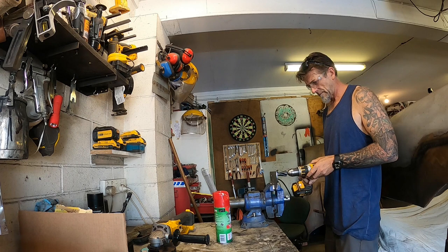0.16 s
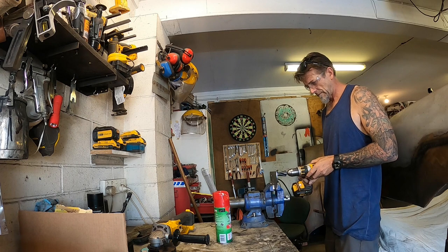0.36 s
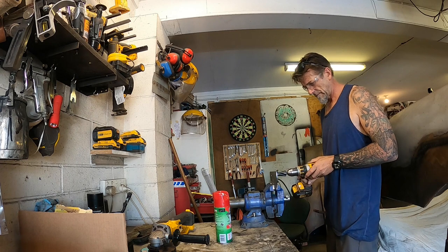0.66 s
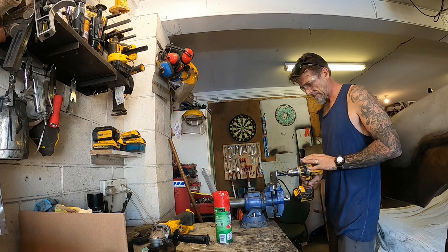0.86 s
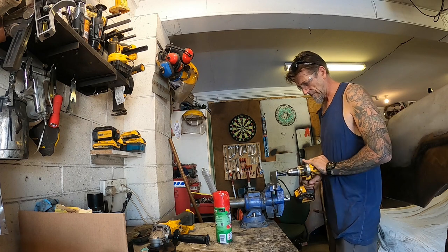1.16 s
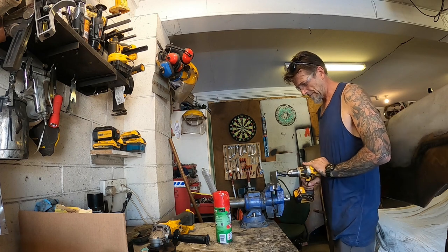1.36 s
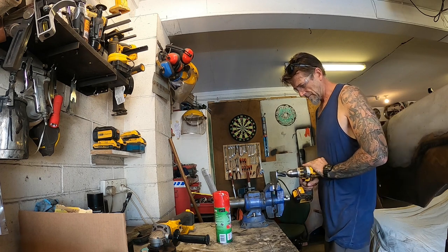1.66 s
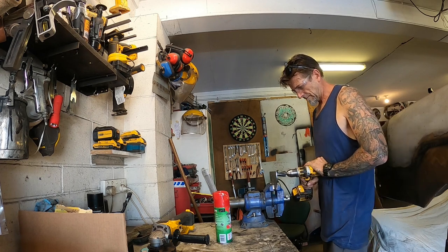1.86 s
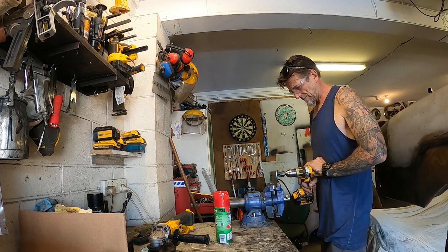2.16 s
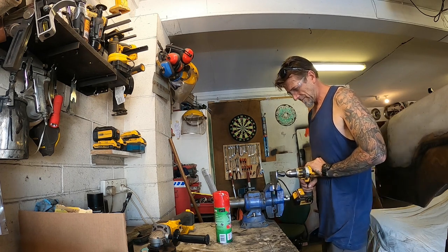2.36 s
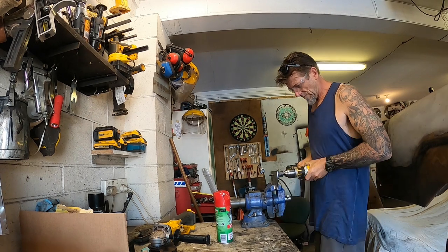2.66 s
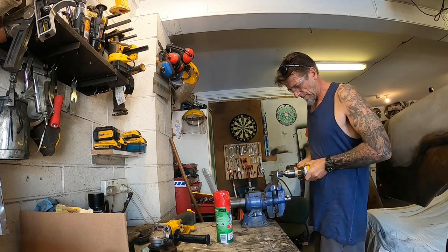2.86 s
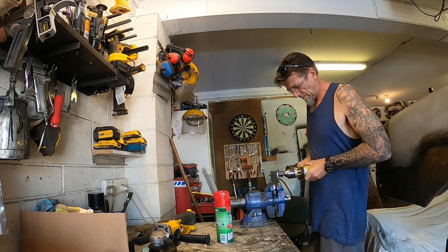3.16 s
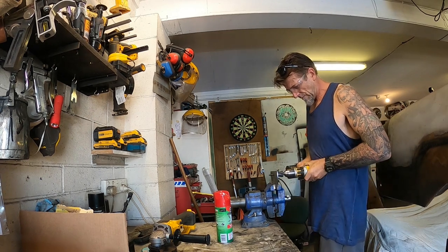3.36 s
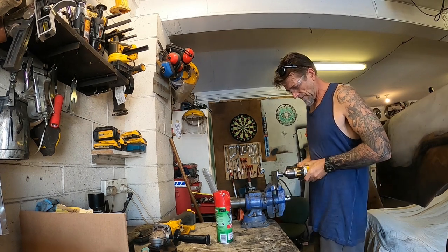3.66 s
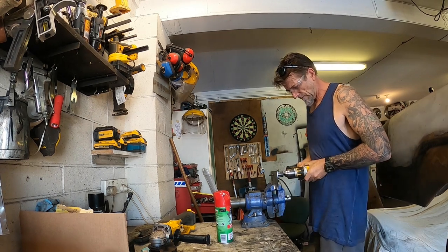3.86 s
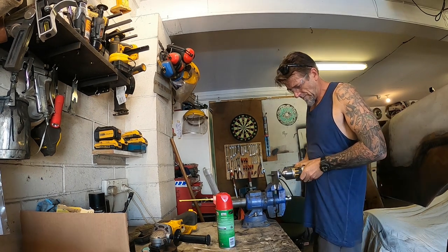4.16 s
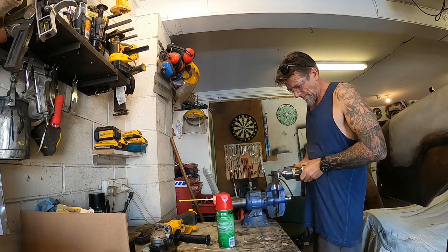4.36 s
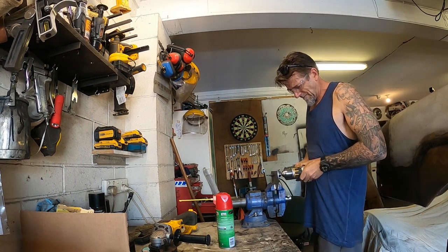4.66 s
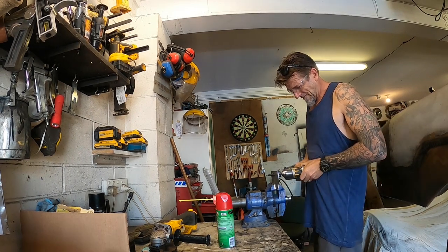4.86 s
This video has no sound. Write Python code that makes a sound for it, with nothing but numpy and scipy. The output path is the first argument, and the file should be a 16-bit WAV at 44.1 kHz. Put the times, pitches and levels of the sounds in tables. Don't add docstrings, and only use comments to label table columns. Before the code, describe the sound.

Handling clicks, then four harsh whining drill pulls shake a metal vice, followed abruptly by a quieter slow ticking cut and a humming, chirping faster one.

```python
import sys
import numpy as np
from scipy import signal
from scipy.fft import rfft, irfft, next_fast_len
from scipy.io import wavfile
from scipy.ndimage import uniform_filter1d, map_coordinates

SR = 44100
rng = np.random.default_rng(int(sys.argv[2]) if len(sys.argv) > 2 else 0)


def makeup_ratio(level_db):
    decades = np.asarray(level_db, float) / 20
    return 10 ** decades


def file_out(sig):
    cols = np.atleast_2d(sig).T
    lim = np.clip(cols, -1, 1)
    pcm = np.round(lim * 32767).astype(np.int16)
    wavfile.write(sys.argv[1], SR, pcm)


N = 221204

PASSAGE_CHANGES = (2.629, 4.028)

# (frequency [Hz], density [dB per Hz])
AIR = [(12, -64), (20, -100), (33, -9), (54, 0), (67, -14), (104, -17.5), (302, -21.5), (431, -38),
       (879, -47.5), (1790, -41.5), (2170, -46.5), (3300, -46.5), (4200, -51.5), (5510, -49), (7060, -52.5),
       (10600, -62), (14000, -86)]
AIR_DB = -51
AIR_STIRS_S, AIR_STIRS_DB = .39, 1.5

# (frequency [Hz], width [Hz], level [dB])
BENCH = [(84, 34, 0), (140, 32, 1.5), (185, 50, -8), (260, 35, -5), (339, 26, -1), (420, 45, -7),
         (517, 25, -7), (592, 26, -4.5), (680, 25, -10), (740, 22, -10), (820, 35, -11), (950, 60, -17)]
# (frequency [Hz], width [Hz], level [dB])
BENCH_TOP = [(53.5, 22, 3), (86, 14.5, 7.5), (136.3, 11.4, 12), (196, 64, -2)]
# (frequency [Hz], width [Hz], level [dB])
LEGS = [(87.5, 10.2, 2), (136.7, 15, 4.5), (175, 18, -36)]
# (frequency [Hz], width [Hz], level [dB])
JAW = [(299, 53, -3), (429, 85, -2), (582, 93, -6.5)]
# (frequency [Hz], width [Hz], level [dB])
VICE_EXTRA = [(582, 112, 0.9), (706, 75, -5.0)]
# (frequency [Hz], width [Hz], level [dB])
STEEL = [(1264, 9.2, -14), (1719, 76, -1), (2440, 4.2, -14), (2900, 13, 0), (3446, 5.2, -5),
         (4290, 15, 5.5), (4420, 1.7, -17), (5400, 60, 15), (5800, 28, -18)]
# (frequency [Hz], width [Hz], level [dB])
STEEL_DEEPER = [(1268, 16, -2), (1975, 45, 0), (2765, 74, -7), (3300, 83, -7), (3660, 78, -9),
                (3990, 130, -5), (4310, 55, -5), (4670, 67, -12), (5570, 98, -6), (6470, 40, -20),
                (7160, 56, -20), (8400, 23, -22), (9600, 67, -25)]
# (frequency [Hz], width [Hz], level [dB])
CASE = [(2060, 12, -4), (2300, 16, -9), (2600, 14, -17), (3700, 12, -3), (4650, 14, -8)]
# (frequency [Hz], width [Hz], level [dB])
FLUTE = [(1900, 250, -5), (2900, 160, 2), (3450, 150, -5), (4100, 200, -6), (4700, 300, -8),
         (5500, 300, -10)]
# (frequency [Hz], width [Hz], level [dB])
CLICK_RING = [(2750, 180, -2.0), (3690, 69, -2), (1300, 1080, 0), (5040, 38, 6.5)]
# (frequency [Hz], width [Hz], level [dB])
CHIRP_RING = [(1980, 90, 0), (3120, 250, -5), (3960, 70, -1), (4280, 100, 4), (4850, 120, -9),
              (5530, 120, 3.5), (5980, 120, -13), (8500, 250, -13)]

# (time [s], click [dB], knock over it [dB], bench over it [dB])
KNOCKS = [(0.3593, -69, 2, 18), (0.395, -37.5, 14.5, 0), (0.4387, -51, 16, 7), (0.5074, -60, 11, 11),
          (0.5235, -53.5, 12, 11), (0.5485, -56, 17.5, 18.5), (0.5902, -70, -3, 32.5),
          (0.7285, -53, -13, 7.5), (0.759, -68, -6, 29.5), (0.8, -68, -4, 26), (0.9874, -48, 2, 0),
          (1.2284, -26, -24, -10), (1.528, -43.5, -3, -11), (1.5379, -35.5, 5.5, -9), (1.8967, -39, -8, -8),
          (2.4786, -54, 0, 3), (2.4867, -43, -14, -10), (2.4975, -54, 22.5, 9), (2.5173, -54, -8, -27)]
# (time [s], peak [dB], pitch [Hz])
TINKS = [
    (0.355, -67, 2600),
    (0.355, -74, 4400),
    (0.517, -59, 2630),
    (0.517, -68, 5050),
    (0.542, -69, 3500),
    (0.542, -69, 5000),
    (0.63, -79, 4970),
]
# (time [s], peak [dB])
PAWL = [
    (2.4867, -31),
    (2.499, -34),
    (2.5167, -34),
    (2.5234, -28),
]
# (frequency [Hz], width [Hz], level [dB])
PAWL_RING = [(2600, 280, 0), (3020, 260, 1), (3530, 160, -7)]

# (time [s], gear mesh [Hz], motor effort [dB], bite of the bit [dB])
PULLS = [
    [(0.986, 1300, -46, -65), (1.0, 1496, -39, -33), (1.045, 2304, -25.5, -27), (1.098, 4150, -22.5, -8.5),
     (1.135, 4457, -21, -9.5), (1.17, 4250, -24.5, -20), (1.227, 3000, -26, -17.5),
     (1.255, 2462, -37.5, -26.5), (1.49, 2186, -67, -40)],
    [(1.525, 1807, -69, -55), (1.55, 1914, -37, -64), (1.58, 2158, -24.5, -21.5), (1.628, 2630, -24.5, -5),
     (1.652, 2060, -24.5, -46), (1.69, 2050, -27.5, -19), (1.758, 2050, -42.5, -35),
     (1.87, 2135, -51.5, -65)],
    [(1.89, 1001, -60, -22.5), (1.905, 1227, -28.5, -32), (1.945, 2255, -21.5, -37),
     (1.968, 3480, -23.5, -15.5), (2.05, 3673, -24.5, -10), (2.121, 3610, -22, -14.5),
     (2.19, 2900, -23.5, -6), (2.322, 1994, -48.5, -42), (2.46, 1525, -60, -49)],
    [(2.47, 899, -75, -47), (2.487, 995, -47, -30), (2.53, 1300, -36.5, -35), (2.57, 2249, -23.5, -12),
     (2.628, 3070, -22.5, -11.5)],
]
# (time [s], gear mesh [Hz], motor effort [dB], bite of the bit [dB])
IDLE = [(0.97, 1300, -130, -130)]
# (trigger release time [s], mesh [dB], octave over mesh [dB],
#              slower stages over octave [dB], pitch tremble [share])
WHINE = [
    (1.125, -31, -17, 0, .04),
    (1.675, -26.5, -8, -10, .022),
    (2.15, -29, -15, -5, .029),
    (2.63, -36, -10, 1, .04),
]
# (time [s], bench thump [dB], vice rattle [dB], jaw rattle [dB])
GRABS = [(0.999, -31, -41, -37), (1.017, -19, -48, -44), (1.033, -19, -41, -43), (1.048, -14, -19, -35),
         (1.063, -12, -23, -27), (1.086, -3, -24, -26), (1.101, -15, -12.5, -24), (1.13, -9.5, -17.5, -23),
         (1.155, -12, -10, -16), (1.174, -33, -21.5, -30), (1.191, -7, -17, -26), (1.219, -11.5, -20, -29),
         (1.244, -14, -37, -35), (1.272, -16, -45, -38), (1.291, -17, -62, -39), (1.307, -34, -54, -56),
         (1.574, -44, -40, -37), (1.601, -10, -19.5, -15), (1.636, -23, -21, -26.5), (1.656, -18, -35, -34),
         (1.676, -23, -31, -27), (1.704, -16.5, -30, -31), (1.732, -25, -40, -43), (1.761, -24, -53, -43),
         (1.913, -27.5, -30, -25), (1.936, -24, -29, -21), (1.954, -36, -28, -31), (1.979, -26, -23, -19),
         (1.998, -11.5, -6, -14.5), (2.025, -11, -35, -30), (2.047, -5, -32, -28), (2.066, -20, -28, -13.5),
         (2.091, -21, -16, -11.5), (2.107, -20, -17, -21), (2.132, -11, -32, -26), (2.152, -24, -18, -18),
         (2.168, -24, -13, -21), (2.18, -21, -30, -13), (2.197, -4.5, -22.5, -19), (2.236, -16, -34, -41),
         (2.265, -26, -26, -41), (2.28, -28, -34, -35), (2.539, -45, -39, -23), (2.571, -3, -19.5, -22.5),
         (2.601, -11, -24, -21), (2.621, -7, -16, -12.5)]
# (frequency [Hz], density [dB per Hz])
PULL_GRIND = [(530, -4), (900, -2.5), (1590, -3.5), (1800, -1), (2640, -2), (3550, -3.5), (4710, -11.5),
              (6500, -18), (8450, -68), (14300, -120)]
# (frequency [Hz], density [dB per Hz])
PULL_FIZZ = [(2940, -41), (5000, 1.5), (6680, -12), (7280, -9), (8090, -8), (9640, -10), (12000, -23.5),
             (15600, -19)]
DULL_GRIND_DB = [-0.2, -4.5, -1, 0]
FULL_EFFORT_DB, FULL_BITE_DB = -24, -17
RATTLE_DB, RATTLE_BY_EFFORT, RATTLE_BY_BITE = -22, 0.66, 0.7
FIZZ_DB, FIZZ_BY_EFFORT = -37, 1.32
CASE_FED_DB = 4
WHINE_BY_EFFORT, COAST_DB_PER_S = 2.6, 155
SPIN_UP_DB = 0.04
GRAB_T60_S, GRAB_BLOW = 0.085, 3.04
GRAB_THUMP_DB, GRAB_RATTLE_DB = 42.5, 33.5

# (time [s], speed [turns a second])
SLOW_TURNS = [(2.63, 18.8), (2.874, 20.2), (3.0, 22.0), (3.234, 23.6), (3.36, 24), (3.46, 27.2),
              (3.584, 29.2), (4.03, 29.2)]
# (level [dB], slope [dB per octave of speed])
SLOW_LAYERS = [
    (-48, 10.5),
    (-47.5, 3),
    (-52, 7.5),
]
# (frequency [Hz], level [dB])
SLOW_ANSWER = [(25, -13), (60, -23), (88, -5.5), (118, -1), (148, -1.5), (180, -6), (230, -42)]
# (time [s], peak [dB], vice knock over it [dB])
CATCHES = [(2.6394, -48, 3), (2.6773, -36.5, -1), (2.7272, -43, -3), (2.7364, -41, 0), (2.7781, -38, -0.5),
           (2.8234, -43.5, 3.5), (2.8315, -37.5, 1.5), (2.8868, -45, 3), (2.9253, -37.5, -2.5),
           (2.9704, -48, 9), (3.0126, -36.5, -10), (3.056, -38.5, -7), (3.0664, -43, -1),
           (3.0959, -36.5, -6), (3.1398, -36.5, -12), (3.1792, -37.5, -5.5), (3.2234, -43, -11),
           (3.2344, -39, -10), (3.2674, -40, -5), (3.3054, -45, -2), (3.3189, -43.5, -2),
           (3.3428, -41.5, -7), (3.4226, -40, -4.5), (3.458, -39.5, -0.5), (3.4974, -48, 0),
           (3.5379, -40.5, -13), (3.5744, -50, -7), (3.6064, -45, 0), (3.6384, -46, -1), (3.6661, -43, -2),
           (3.6794, -44, -2), (3.6994, -47, 2), (3.7349, -43, -9), (3.7773, -36, -3), (3.8114, -44, 0),
           (3.8444, -38.5, -7), (3.8794, -36.5, -7), (3.9144, -48, 4), (3.9444, -36, -4), (3.9848, -38, -8)]
# (time [s], peak [dB], pitch [Hz])
SQUEALS = [(2.880, -49.5, 1940), (2.961, -55, 2260), (3.000, -54.5, 2450), (3.042, -55, 2440),
           (3.082, -54, 2360), (3.121, -49, 2400), (3.175, -58, 1850), (3.206, -49.5, 2440),
           (3.242, -47.5, 2440), (3.256, -62, 2440), (3.333, -49, 2485), (3.352, -50, 2390),
           (3.388, -53, 2440)]
# (frequency [Hz], density [dB per Hz])
SLOW_RUB = [(30, 7), (70, 9), (150, -2.5), (300, 10.5), (430, 5.5), (510, 3), (590, 11.5), (800, 2.5),
            (1000, -89)]
# (frequency [Hz], density [dB per Hz])
SLOW_GRIND = [(470, -33), (800, -5), (1540, -3), (1920, 1.5), (2600, -8), (2920, 3), (3170, -5.5),
              (5610, -13), (6530, -21.5), (13000, -41)]
CATCH_DB, CATCH_KNOCK_DB = 11.5, 20
SHAKE_FROM_S, SHAKE_BEFORE_DB = 3.36, -3

# (time [s], speed [turns a second])
FAST_TURNS = [(4.03, 47.4), (4.12, 46.4), (4.256, 47.9), (4.436, 48.8), (4.502, 48.6), (4.622, 41.8),
              (4.712, 36.0), (4.768, 33.4), (4.828, 30.5), (4.914, 27), (5.02, 22)]
# (level [dB], slope [dB per octave of speed])
FAST_LAYERS = [
    (-38.5, 8),
    (-55.5, -4),
    (-45, -0.5),
    (-60.5, 5),
]
# (frequency [Hz], level [dB])
FAST_ANSWER = [(45, -16), (97, -5), (146, -1), (180, -3), (210, -10), (258, -2), (295, -1), (345, 0),
               (390, 0), (430, -7), (500, -22)]
GEAR_ORDERS = [-22, -7, -13, -15, -12, -4, -1, 1, -5, -8]
# (frequency [Hz], density [dB per Hz])
FAST_RUB = [(30, -22), (120, 3), (200, -0.5), (450, -0.5), (600, 1), (800, -2), (1000, -90)]
# (frequency [Hz], density [dB per Hz])
FAST_GRIND = [(470, -7.5), (800, -5), (1630, -4.5), (2020, -4), (2280, -4), (5590, -9.5), (6200, -48),
              (8060, -56), (13600, -120)]
# (frequency [Hz], density [dB per Hz])
FAST_FIZZ = [(3650, -26), (6200, 0), (8890, -10.5), (10700, -12), (14100, -22), (15500, -37)]
EASE_S, EASE_DB_PER_S = 4.79, 30

# (frequency [Hz], t60 [s])
GARAGE_T60 = [(100, 0.32), (1000, 0.43), (5000, 0.21), (12000, 0.015)]
# (frequency [Hz], side minus mid [dB])
SIDE_DB = [(40, -15), (70, -12), (125, -21), (250, -25), (400, -21), (550, -12), (1000, -10), (2000, -10),
           (4000, -5.5), (8000, -.5), (14000, -1)]
# (frequency [Hz], left minus right [dB])
LEAN = [(60, -1.5), (110, -1), (200, -.5), (380, 0), (700, 2.2), (1290, 1.0), (2380, 1.2), (4400, .5),
        (8120, -2.5), (15000, -7)]


def seconds():
    return np.arange(N) / SR


def unit(x):
    return x / np.sqrt(np.mean(x ** 2) + 1e-20)


def along(points, hz):
    f, v = np.transpose(points)
    return np.interp(np.log(hz + 1), np.log(f + 1), v)


def curves(*tables):
    s, *columns = np.transpose(np.vstack(tables))
    return [np.interp(seconds(), s, c) for c in columns]


def wobble(rate):
    at = np.arange(0, N + 32, 32)
    knots = rng.standard_normal(int(N * rate / SR) + 4)
    return np.interp(np.arange(N), at, map_coordinates(knots, [at * rate / SR]))


def above(hz, corner):
    return 1 / (1 - 1j * corner / (hz + 1))


def below(hz, corner):
    return 1 / (1 + 1j * hz / corner)


def filtered(x, response):
    m = next_fast_len(N + SR // 2)
    return irfft(rfft(x, m) * response(np.fft.rfftfreq(m, 1 / SR)), m)[..., :N]


def rung(x, modes, between_db=-120, lo_hz=0, hi_hz=1e5):
    use = [m for m in modes if lo_hz <= m[0] < hi_hz]

    def response(f):
        total = np.full(len(f), makeup_ratio(between_db), complex)
        for k, (centre, width, db) in enumerate(use):
            damping = 1j * f * width
            total += (-1) ** k * makeup_ratio(db) * damping / (centre * centre - f * f + damping)
        return total

    return filtered(x, response)


def scrape(spectrum, modes, lift, grain, again=0):
    rough = (rng.standard_normal(N) + again) * grain
    level_modes = [(centre, width, 0) for centre, width, _ in modes]
    ringing = rung(rough, level_modes, between_db=-lift)
    return unit(filtered(ringing, lambda hz: makeup_ratio(along(spectrum, hz))))


def strikes(rows, t60, blow_db=15):
    t = np.arange(SR // 10) / SR
    trains = np.zeros((len(rows[0]) - 1, N + len(t)))
    for s, db, *rel in rows:
        burst = rng.standard_normal(len(t)) * makeup_ratio(-60 * t / t60)
        burst[0] = makeup_ratio(blow_db)
        levels = makeup_ratio(db + np.array([0, *rel]))
        trains[:, round(s * SR):][:, :len(t)] += levels[:, None] * burst
    return trains[:, :N]


def bites(rate, spread_db):
    return (rng.random(N) < rate / SR) * makeup_ratio(spread_db * rng.standard_normal(N))


def by_speed(turns, layers, at_hz):
    turns_hz, = curves(turns)
    return [db + slope * np.log2(turns_hz / at_hz) for db, slope in layers]


def background():
    t = seconds()
    stir = makeup_ratio(1.2 * wobble(1.8) + AIR_STIRS_DB * (t > AIR_STIRS_S))
    air = scrape(AIR, [(7280, 400, 0)], 4.1, stir)
    mains = makeup_ratio(-3 + 1.5 * wobble(6)) * np.sin(2 * np.pi * 49.5 * t + .4 * wobble(4))
    lamp = makeup_ratio(-35) * np.sin(2 * np.pi * 1825 * t)
    return makeup_ratio(AIR_DB) * (air + mains + lamp)


def squeals(rows):
    out, t = np.zeros(N), np.arange(SR // 20) / SR
    swell = (t / .01) * np.exp(1 - t / .01)
    for s, db, hz in rows:
        out[round(s * SR):][:len(t)] += makeup_ratio(db) * np.sin(2 * np.pi * hz * t) * swell
    return out


def handling():
    click, knock, boom = strikes(KNOCKS, t60=.07)
    bright = rung(click, CLICK_RING, between_db=-19.0)
    bright = filtered(bright, lambda hz: below(hz, 6500) ** 3 * above(hz, 500))
    boom = rung(rung(boom, BENCH_TOP), [(125, 78, 0)])
    pawl = makeup_ratio(9) * rung(strikes(PAWL, t60=0.027)[0], PAWL_RING)
    contacts = makeup_ratio(8.5) * bright + makeup_ratio(17.5) * rung(knock, JAW) + makeup_ratio(29.5) * boom
    return pawl + squeals(TINKS) + contacts


def whine():
    hz, effort_db, _ = curves(IDLE, *PULLS)
    t = seconds()
    pull = np.searchsorted([rows[0][0] for rows in PULLS[1:]], t)
    off_s, db, octave_db, slower_db, tremble = np.transpose(WHINE)[:, pull]
    db = db + WHINE_BY_EFFORT * np.minimum(effort_db - FULL_EFFORT_DB, 0)
    db = db - COAST_DB_PER_S * np.maximum(t - off_s, 0)
    spin_up = uniform_filter1d(np.gradient(np.log2(hz)) * SR, size=600)
    db = db + SPIN_UP_DB * np.clip(spin_up, 0, 20)
    octave_db = octave_db + db
    turn = 2 * np.pi * np.cumsum(hz * (1 + tremble * wobble(260))) / SR
    beat = makeup_ratio(3.8 * wobble(130) + 3 * np.sin(turn / 36))
    mesh = np.sin(turn + np.pi / 7 * wobble(500))
    octave = makeup_ratio(3.5 * wobble(200) - 4 * np.log2(hz / 2400)) * np.sin(2 * turn + 1.5 * wobble(300))
    half = makeup_ratio(slower_db + 3 + 4 * wobble(90)) * np.sin(turn / 2 + wobble(150))
    four_fifths = makeup_ratio(slower_db - 1.5 + 5 * wobble(60)) * np.sin(.8 * turn + wobble(150))
    upper = octave + half + four_fifths
    gears = np.sqrt(2) * unit(beat) * (makeup_ratio(db + 1.0) * mesh + makeup_ratio(octave_db - 1.0) * upper)
    return gears + makeup_ratio(1.5) * rung(gears, CASE)


def grabs():
    kick, vice, jaw = trains = np.zeros((3, N))
    for s, *db in GRABS:
        trains[:, round(s * SR)] = makeup_ratio(db)
    thump = sum(rung(-kick, [mode]) for mode in LEGS)
    thump = filtered(thump, lambda hz: above(hz, 40) ** 2 * below(hz, 400) ** 2)
    blows = bites(900, spread_db=4.0)
    dying = makeup_ratio(-60 * np.arange(SR // 4) / SR / GRAB_T60_S)

    def shaken(shake):
        return blows * signal.fftconvolve(shake, dying)[:N] + GRAB_BLOW * shake

    rattle = rung(shaken(vice), BENCH, lo_hz=220, hi_hz=470) - rung(shaken(jaw), BENCH, lo_hz=470)
    rattle = filtered(rattle, lambda hz: above(hz, 120) * below(hz, 1400) ** 2)
    return makeup_ratio(GRAB_THUMP_DB) * thump + makeup_ratio(GRAB_RATTLE_DB) * rattle


def pulls():
    _, grind_db, thump_db = curves(IDLE, *PULLS)
    effort_db = grind_db - FULL_EFFORT_DB
    rattle_db = RATTLE_DB + RATTLE_BY_EFFORT * effort_db + RATTLE_BY_BITE * (thump_db - FULL_BITE_DB)
    fizz_db = FIZZ_DB + FIZZ_BY_EFFORT * effort_db
    grab = wobble(45.1)
    thump = unit(rung(bites(200, spread_db=-10.0) * makeup_ratio(1.3 * grab), BENCH, hi_hz=220))
    thump = filtered(thump, lambda hz: above(hz, 32) ** 2 * below(hz, 1500) ** 2)
    rattle = unit(rung(bites(600, spread_db=0.5) * makeup_ratio(2.0 * grab), BENCH, lo_hz=220))
    rattle = filtered(rattle, lambda hz: below(hz, 3000) ** 2)
    grind = scrape(PULL_GRIND, STEEL[:-1], 7, makeup_ratio(1.6 * grab + 1.6 * wobble(400)))
    pull = np.searchsorted([rows[0][0] for rows in PULLS[1:]], seconds())
    low_grind = filtered(grind, lambda hz: 1 / (1 + (hz / 1700) ** 6))
    grind = grind + (makeup_ratio(DULL_GRIND_DB)[pull] - 1) * low_grind
    case = rung(makeup_ratio(grind_db + CASE_FED_DB) * grind, CASE)
    fizz = scrape(PULL_FIZZ, [(7100, 300, 0)], 3, makeup_ratio(.8 * grab + 1.1 * wobble(400)))
    shaking = grabs() + makeup_ratio(thump_db - 7.0) * thump + makeup_ratio(rattle_db - 9.0) * rattle
    return shaking + makeup_ratio(grind_db - 2.5) * grind + case + makeup_ratio(fizz_db - 7.5) * fizz


def shaft(turns, answer, orders_db, rough, smear):
    turns_hz, = curves(turns)
    angle = 2 * np.pi * np.cumsum(turns_hz) / SR
    tones = np.zeros(N)
    for k, db in enumerate(orders_db, start=1):
        level = makeup_ratio(db + along(answer, k * turns_hz) + rough * wobble(18))
        tones += level * np.sin(k * angle + 0.29 * rough * wobble(2.73) + smear * k * k)
    return angle, tones


def slow_cut():
    shake_db, rattle_db, grind_db = by_speed(SLOW_TURNS, SLOW_LAYERS, 25)
    angle, shake = shaft(SLOW_TURNS, SLOW_ANSWER, np.zeros(8), rough=1.5, smear=.3)
    click, knock = strikes(CATCHES, t60=.045, blow_db=18)
    flute = rung(click, FLUTE, between_db=-19)
    flute = filtered(flute, lambda hz: below(hz, 6000) ** 4 * above(hz, 900))
    vice = rung(rung(knock, JAW + VICE_EXTRA), [(536, 1800, 0)])
    catch = makeup_ratio(CATCH_DB) * flute + makeup_ratio(CATCH_KNOCK_DB) * vice
    rub = makeup_ratio(rattle_db - 2.0) * scrape(SLOW_RUB, BENCH, 17.0, makeup_ratio(1.1 * wobble(40)))
    grain = makeup_ratio(0.33 * np.sin(angle) + 2.3 * wobble(29.95) + 0.89 * wobble(300))
    grind = makeup_ratio(grind_db - 1.5) * scrape(SLOW_GRIND, STEEL, 2.9, grain)
    shake_db = shake_db + SHAKE_BEFORE_DB * np.clip((SHAKE_FROM_S - seconds()) / 0.037, 0, 1)
    return makeup_ratio(shake_db - 1.5) * shake + catch + rub + grind + squeals(SQUEALS)


def fast_cut():
    hum_db, rattle_db, grind_db, fizz_db = by_speed(FAST_TURNS, FAST_LAYERS, 48)
    ease_db = -EASE_DB_PER_S * np.maximum(seconds() - EASE_S, 0)
    angle, hum = shaft(FAST_TURNS, FAST_ANSWER, GEAR_ORDERS, rough=1.1, smear=1.35)
    profile = unit(irfft(np.exp(2j * np.pi * rng.random(81))))
    place = angle / (2 * np.pi) * 160 + .25 * wobble(12)
    burrs = map_coordinates(profile, [place], mode="grid-wrap")
    throb = makeup_ratio(1.0 * np.sin(angle) + 0.5 * np.sin(2 * angle) + 0.46 * wobble(300) + 0.22 * wobble(25.14))
    rub = makeup_ratio(rattle_db + 1.5) * scrape(FAST_RUB, BENCH[1:], 4, throb, .18 * burrs)
    teeth = np.sin(26.6 * angle + .9 * np.sin(angle) + 1.1 * wobble(30))
    mesh = makeup_ratio(hum_db - 16 + 3.5 * wobble(20)) * teeth
    once_a_turn = np.diff(angle // (2 * np.pi), prepend=0)
    nick = once_a_turn * np.sign(wobble(900)) * makeup_ratio(23 + 2.5 * wobble(40))
    hiss = rng.standard_normal(N) * makeup_ratio(9 * np.cos(angle) - 9)
    chirp = unit(rung(nick + hiss, CHIRP_RING))
    edge = scrape(FAST_GRIND, STEEL_DEEPER[1:], 8.5, throb, .45 * burrs) + makeup_ratio(-6) * chirp
    grind = makeup_ratio(grind_db + ease_db - 1.5) * edge + mesh
    fizz = makeup_ratio(fizz_db + ease_db) * scrape(FAST_FIZZ, STEEL_DEEPER, 3.7, throb)
    return makeup_ratio(hum_db - 8.0) * hum, rub + grind + fizz


def garage(x, wet_db):
    hz, t, z = signal.stft(rng.standard_normal((2, SR // 2)), SR, nperseg=256)
    t60 = along(GARAGE_T60, hz)[:, None]
    tail = signal.istft(z * makeup_ratio(-60 * t / t60) / np.sqrt(t60), SR, nperseg=256)[1]
    tail = tail / np.linalg.norm(tail[0])
    hz, t, z = signal.stft(x, SR, nperseg=512)
    drift = np.cumsum(rng.standard_normal(z.shape), axis=1) * np.clip(hz / 4000, .15, 2.5)[:, None]
    moved = signal.istft(z * np.exp(1j * drift), SR, nperseg=512)[1][:N]
    late = np.pad([x, moved], ((0, 0), (150, 0)))
    echo = signal.fftconvolve(late, tail, axes=1)[:, :N]
    side = filtered(echo[1], lambda f: makeup_ratio(along(SIDE_DB, f) + 5.0))
    middle = filtered(echo[0], lambda f: np.abs(above(f, 60)))
    return x + makeup_ratio(wet_db) * middle + np.array([side, -side])


def scene():
    passage = np.searchsorted(PASSAGE_CHANGES, seconds())
    first = garage(background() + handling() + whine() + pulls(), wet_db=-6.0)
    slow = garage(slow_cut(), wet_db=-6.5)
    hum, cutting = fast_cut()
    return np.choose(passage, [first, slow, hum + garage(cutting, wet_db=-6.0)])


def roll_off(x):
    return signal.sosfilt(signal.butter(12, 15750, fs=SR, output="sos"), x)


def record(dry):
    rounded = dry / (1 + np.abs(dry / .66) ** 4) ** (1 / 4)

    def lean(hz):
        lag = np.exp(-2j * np.pi * hz * 1.5 / SR / (1 + (hz / 4000) ** 2))
        half_db = along(LEAN, hz) / 2
        return np.array([makeup_ratio(half_db) * lag, makeup_ratio(-half_db)]) / (1 + (hz / 13000) ** 8)

    return roll_off(filtered(rounded, lean))


dry = scene()
out = record(dry)
file_out(out)
```